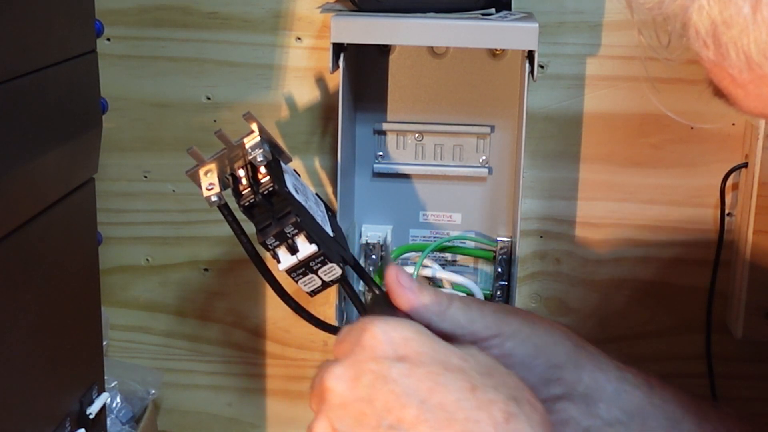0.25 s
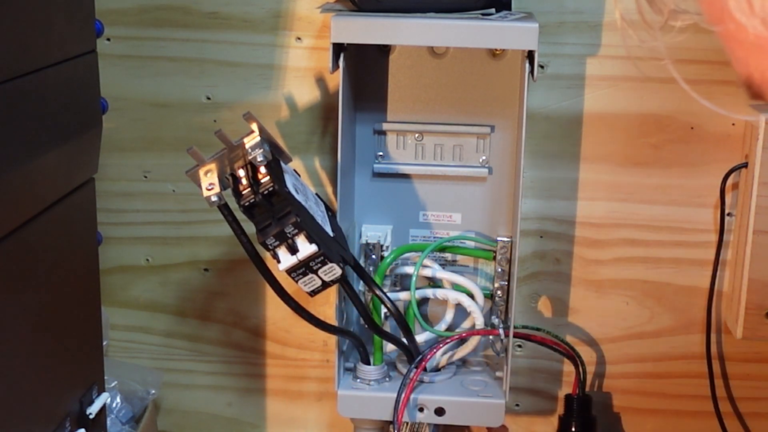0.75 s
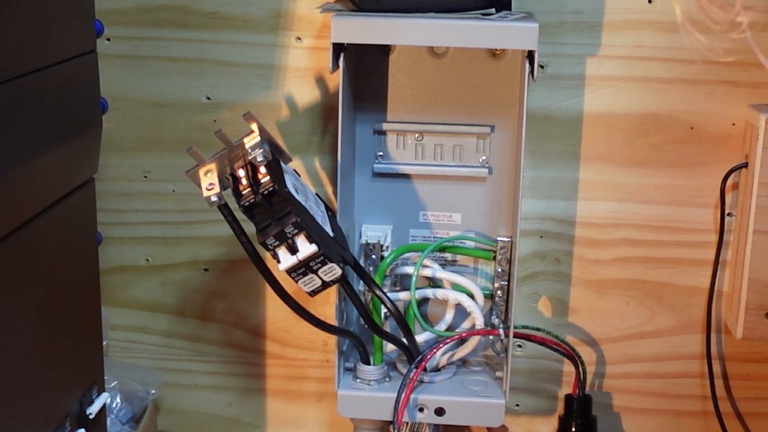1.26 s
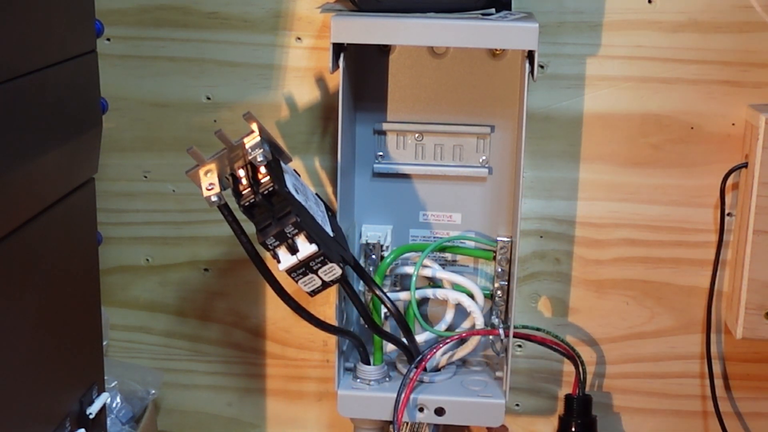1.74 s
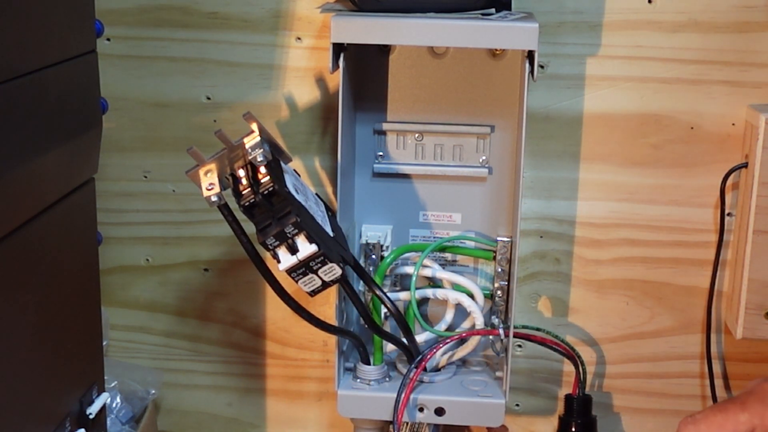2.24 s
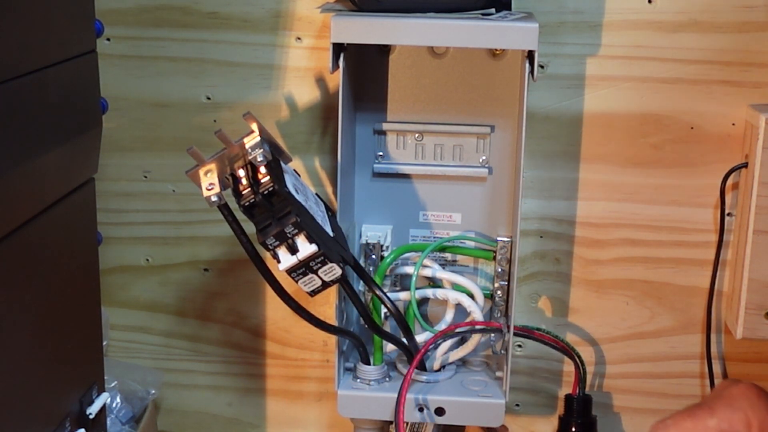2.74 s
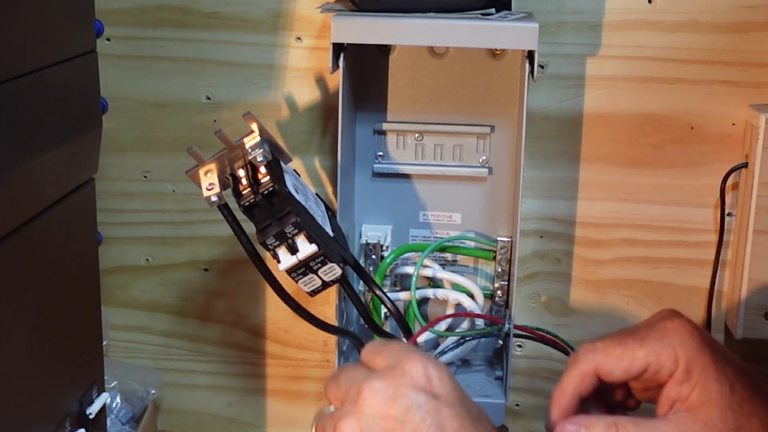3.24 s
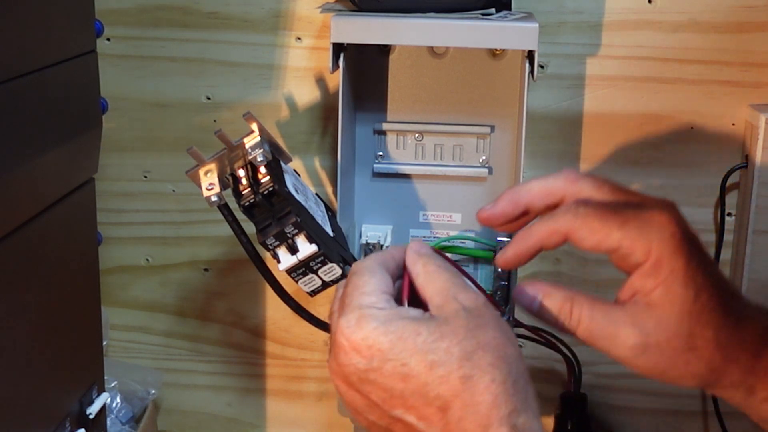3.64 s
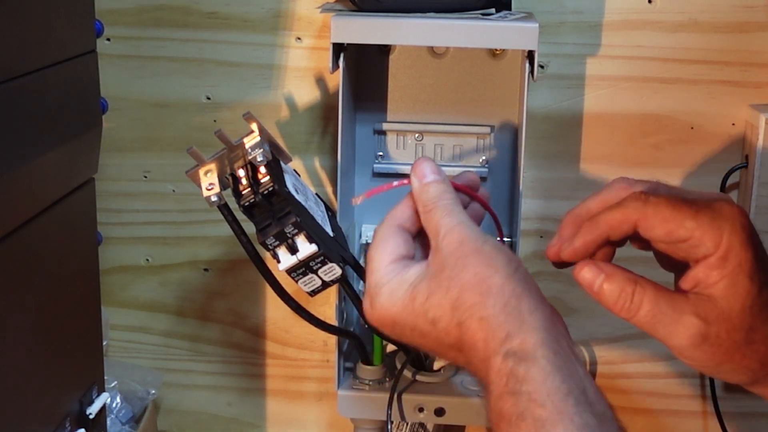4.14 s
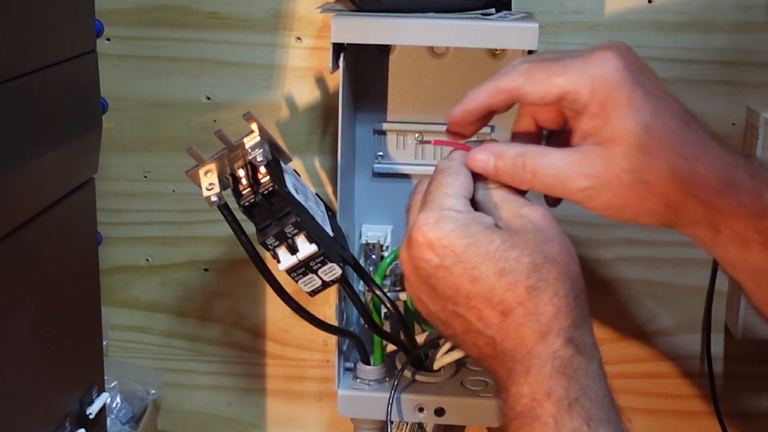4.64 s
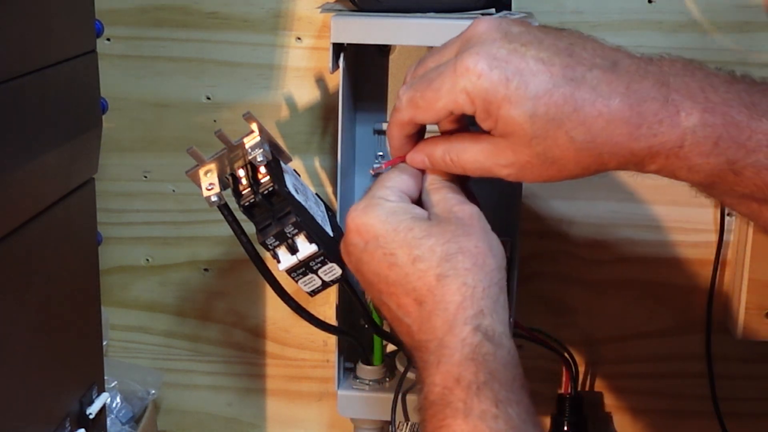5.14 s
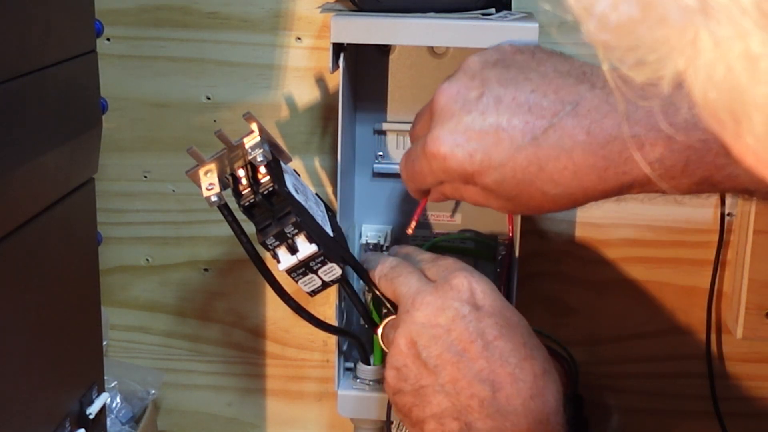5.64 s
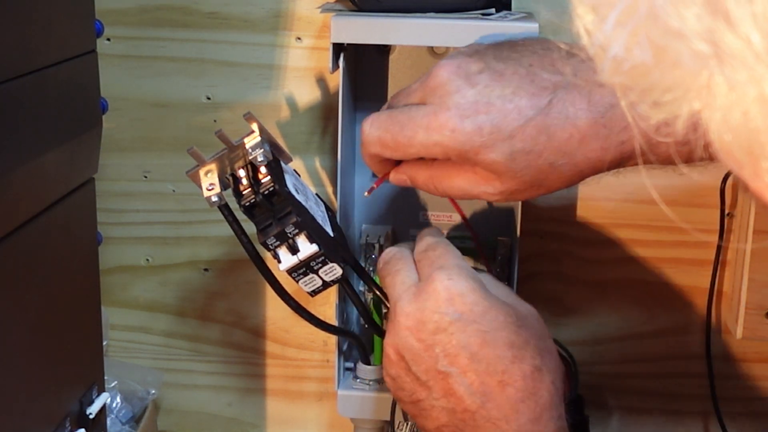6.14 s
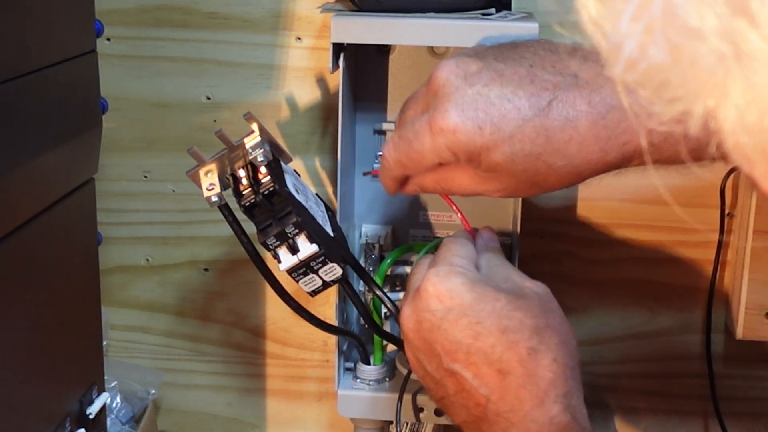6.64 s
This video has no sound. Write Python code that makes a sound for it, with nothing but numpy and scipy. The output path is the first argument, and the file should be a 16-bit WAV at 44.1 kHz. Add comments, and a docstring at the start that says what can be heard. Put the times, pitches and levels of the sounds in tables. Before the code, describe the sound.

A screwdriver clatters down among tools and rocks to rest, then wires tap, scrape and tick against a sheet-steel box in a small wooden shed.

```python
"""Hands route stiff wires inside a sheet-steel electrical box in a small wooden shed, heard from close by.
A sleeve rustles first: clumped grains of noise. At 1.4 s a screwdriver drops among tools with a clatter and
its handle rocks to rest: struck modes ring under dying noise. From 2.7 s wires tap and scrape on the box,
dense grains exciting its modes; a small part tinks and copper sings on an edge. Thumps boom in the planks
from the drop onwards, and the shed answers, over a steady room tone that differs partly between the sides."""
import sys
import numpy as np
from scipy import signal
from scipy.fft import rfft, irfft, next_fast_len
from scipy.io import wavfile
from scipy.ndimage import map_coordinates

SR = 44100
rng = np.random.default_rng(int(sys.argv[2]) if len(sys.argv) > 2 else 0)


def to_wav(sig):
    """Store sig (one row per channel, or 1-D mono) as 16-bit WAV at the path in sys.argv[1].

    Samples outside -1..1 are clipped; the rate is SR.
    """
    pcm = np.clip(np.atleast_2d(sig), -1, 1) * 32767
    pcm = np.round(pcm).astype(np.int16)
    wavfile.write(sys.argv[1], SR, pcm.T)  # frames by channels


def gain_from_db(level_db):
    """Turn a decibel level (scalar or array-like) into a linear amplitude factor."""
    decades = np.asarray(level_db, float) / 20
    return 10 ** decades


N = 303849

# modes of the sheet-steel box: (nominal frequency [Hz], level [dB], free T60 [s])
BOX_MODES = [(593, -6.5, 0.2), (760, -16.5, 0.24), (958, -14, 0.19), (1311, 0, 0.6), (1618, -4.5, 0.087),
             (1724, 8, 0.12), (2190, -1, 0.14), (2384, 0, 0.07), (2560, -9.5, 0.16), (2830, -38, 0.024),
             (3305, -14, 0.45), (3520, -12, 0.17), (3932, -2, 0.2), (4400, 8.5, 0.041), (4596, -3.5, 0.26),
             (4944, -6, 0.3), (5380, -36.5, 0.026), (5810, -35, 0.047), (5730, -29.5, .1), (7600, -6, 0.19),
             (9200, -12, 0.23)]
# noise spectrum of contact on the box: (frequency [Hz], level [dB per Hz])
CRACK_SPECTRUM = [(59, -57), (100, -32), (420, -29), (560, -19), (614, -26), (1180, -11.5), (1730, -3),
                  (1880, -8.5), (2220, -17.5), (4460, -10.5), (7410, -27), (15500, -34)]
# noise spectrum of contact among the tools and on the bench: (frequency [Hz], level [dB per Hz])
CRASH_SPECTRUM = [(88, -33.5), (150, -9), (471, -9.5), (844, -8), (1480, -15.5), (2450, -8.5),
                  (2760, -15.5), (3760, -21), (9000, -25), (15500, -49)]


def wire_taps():
    """Modal excitation: each tap of a wire or finger sets the box's damped modes ringing."""
    # (time [s], middle-band level [dB], thud re middle [dB], treble re middle [dB])
    taps = [(2.734, -24.5, -9, 0), (2.804, -25.5, -10, -3.5), (2.854, -27, -11, -47),
            (2.894, -31, -7.5, -19.5), (2.922, -35.5, -4, 1.5), (2.941, -19.5, -20, -39),
            (2.973, -24.5, -29, -28.5), (3.018, -30, -7.5, -28), (3.052, -25, -33, 3.5),
            (3.091, -15, -16, -31.5), (3.103, -17, -16, -14.5), (3.115, -14, -13, -34),
            (3.138, -12.5, -14.5, -21), (3.155, -20.5, -27, -6), (3.262, -34.5, -3, 4),
            (3.28, -21, -13, -0.5), (3.3, -32.5, -0.5, 3), (3.358, -19.5, -20, -2.5),
            (3.369, -12, -24, 1.5), (3.378, -9, -18.5, -20.5), (3.395, -17.5, -17, -2),
            (3.421, -23.5, -4.5, -14), (3.58, -32, -8, -2.5), (3.661, -35, -5, -4.5),
            (3.765, -42.5, -9, -5.5), (3.793, -35.5, -8, -3), (3.818, -29, -13, -19.5),
            (3.842, -25.5, -17, -26), (3.862, -31.5, -13, -14), (3.895, -24, -13.5, -11),
            (3.902, -20.5, -20, -21), (3.954, -29, -12, -4), (3.97, -26, -13, -3), (4.016, -39, -18, -16),
            (4.357, -44.5, -17.5, -15.5), (4.596, -43, -31, -1), (4.5995, -10, -29, -2),
            (4.755, -23.5, -11, -8), (5.296, -38, -31, -10), (5.333, -31.5, -9.5, -14),
            (5.617, -22, -31, 4), (5.78, -22, -15.5, -4), (5.821, -20, -12.5, -18),
            (5.835, -33.5, 5.5, -21), (5.997, -32, -36, -17), (6.062, -34.5, -6, -16), (6.2, -36, -19, -21),
            (6.23, -21, -20, -22), (6.238, -17.5, -22, -5), (6.269, -34, -3.5, -21), (6.491, -25, -34, -2),
            (6.503, -25, -11.5, -4), (6.523, -31, 1.5, -14), (6.577, -42.5, -1, -1),
            (6.661, -39.5, -8, 0.5), (6.727, -30, -20, -11), (6.741, -22.5, -29, 3.5),
            (6.763, -13.5, -21, -4), (6.783, -15.5, -13, -30), (6.799, -28.5, -26, -16),
            (6.818, -23, -37, -9)]
    return strikes(taps, BOX_MODES, CRACK_SPECTRUM, (800, 3100, 5700), top_db=-10, top_follows=0.34,
                   t60=0.051, crack_db=-7.5, gain_db=-0.5, grip=29.7, chatter_s=0.003)


def scrape():
    """Friction: dense micro-impacts under each stroke excite the box's modes over a broad rasp."""
    # wires dragging on the box: (time [s], hold [s], level [dB], brightness re middle band [dB])
    strokes = [(2.72, 0.057, -57.5, -2), (2.89, 0.25, -48, -5), (3.24, 0.09, -54.5, -1.5),
               (3.47, 0.27, -65, 0), (3.8, 0.25, -59, -4), (4.38, 0.095, -61.5, -30),
               (4.68, 0.28, -57.5, -1), (5.06, 0.094, -65, 6.5), (5.34, 0.014, -51.5, 3.5),
               (5.45, 0.13, -67, 5.5), (5.681, 0.059, -44, -0.5), (5.84, 0.23, -55.5, -4),
               (6.189, 0.13, -52.5, -6), (6.45, 0.35, -59.5, -4), (6.771, 0.073, -50.5, 6.5)]
    peaks = [(hz, 7 / t60, db) for hz, db, t60 in BOX_MODES]  # rubbing contact widens each mode
    rub = grains(7400, spread_db=-1.0, clump_db=3)
    rasp = coloured(rub, CRACK_SPECTRUM) + gain_from_db(-1.0) * unit(filtered(rub, resonances(peaks)))
    low, mid, high, top = bands(rasp, (900, 3200, 6000))
    body = (2.37 * low + mid) / np.std(mid)
    bright = unit(high + top)
    out = np.zeros(N)
    for start_s, held_s, db, bright_db in strokes:
        out += gain_from_db(stroke(start_s, held_s, db)) * (body + gain_from_db(bright_db) * bright)
    return out


def copper_drag():
    """Resonant filtering of friction: bare copper dragged over a steel edge sings above its rasp."""
    # one stroke of copper on the edge: (time [s], hold [s], level [dB])
    drag = (5.87, 0.16, -47)
    # resonances of the singing: (centre [Hz], width [Hz], level [dB])
    strand = [(1760, 38, -23), (2157, 37, 0), (2550, 35, -15), (4880, 84, 1), (6000, 50.7, -5),
              (7020, 55, -6), (7900, 130, -10.5), (8740, 150, -4), (11100, 37, -42), (13300, 240, -11)]
    # spectrum of the rasp: (frequency [Hz], level [dB per Hz])
    rasp = [(240, -38), (400, -10.5), (1560, -2), (3740, -10), (4840, -3), (15500, -20.5)]
    rub = grains(8000, spread_db=2, clump_db=2)
    singing = unit(filtered(rub, resonances(strand)))
    return gain_from_db(stroke(*drag)) * (singing + gain_from_db(-0.5) * coloured(rub, rasp))


def part_tinks():
    """Modal excitation of a small body: a small steel part is touched and rings at a few high modes."""
    # (time [s], middle-band level [dB], thud re middle [dB], treble re middle [dB])
    tinks = [(5.1158, -48.5, -33, 2), (5.1726, -56, -38, -3)]
    # modes of the part: (nominal frequency [Hz], level [dB], free T60 [s])
    part = [(2608, -4, 0.14), (4845, -14, 0.25), (7820, 2, 0.066)]
    return strikes(tinks, part, CRACK_SPECTRUM, (1500, 3500, 6000), top_db=-19.5, top_follows=0,
                   t60=0.08, crack_db=-20, gain_db=3.5, grip=5.9, chatter_s=0.0023)


def screwdriver_drop():
    """Repeated impact: the falling screwdriver makes a run of contacts, each ringing the tools' modes."""
    # (time [s], middle-band level [dB], thud re middle [dB], treble re middle [dB])
    clatter = [(1.3589, -23, 7, 0), (1.3775, -11.5, -30.5, 1), (1.3914, -14, 2.5, -8.5),
               (1.4108, -7.5, -12, -7), (1.4245, -14.5, 2.5, -26.5), (1.4434, -12, 6, -29),
               (1.458, -9.5, -33, -3), (1.4746, -7.5, -4.5, -19.5), (1.4919, -7.5, -1, -11),
               (1.5231, -13.5, 3, -1.5), (1.5328, -16.5, 14, -21), (1.5454, -18.5, 3, -5),
               (1.5555, -24.5, -5, -19.5), (1.5725, -39, 11, 8), (1.5844, -39, -7.5, 8),
               (1.5974, -42.5, 11, 8.5), (1.6166, -35, 11, -1)]
    # modes of the tools: (nominal frequency [Hz], level [dB], free T60 [s])
    tools = [(400, -11, .08), (607, -8, .08), (710, -8, .08), (825, -6, .08), (900, -8, .08),
             (1700, -11, .1), (2391, 4, .12), (2510, -8, .2), (2960, -15, .1), (3170, -15, .1),
             (3310, -14, .1), (3740, -14, .08), (5460, -22, .06), (6310, -24, .05), (6750, -26, .05),
             (8180, -28, .05), (10430, -27, .08), (12800, -30, .06)]
    return strikes(clatter, tools, CRASH_SPECTRUM, (1200, 4000, 7500), top_db=-7.5, top_follows=0.87,
                   t60=0.062, crack_db=-6, gain_db=-1.0, grip=5, chatter_s=0.0001)


def handle_rocking():
    """Dissipative rocking: after a double first landing, shrinking intervals and mostly fainter contacts."""
    # (time [s], middle-band level [dB], treble re middle [dB])
    rocking = [(1.916, -29, -2.5), (1.932, -27, -20), (2.118, -33.5, -0.5), (2.266, -36, -2),
               (2.375, -40.5, -5.5), (2.458, -41, -5.5), (2.533, -47.5, -8), (2.582, -43, -4),
               (2.624, -49.5, -4), (2.666, -50.5, 3.5)]
    # modes of the handle: (nominal frequency [Hz], level [dB], free T60 [s])
    handle = [(729, 4, 0.089), (926.6, 3.5, 0.15), (1370, -11, 0.1), (1680, -28, 0.51),
              (2494, -52.5, 0.069), (2490, -5.5, 0.04), (3850, -34, 0.14), (4172, -36, 0.18),
              (4060, -23, 0.18), (5360, -17, 0.04)]
    thud_db = -13  # re middle band
    landings = [(start_s, db, thud_db, treble_db) for start_s, db, treble_db in rocking]
    return strikes(landings, handle, CRASH_SPECTRUM, (500, 1500, 3500), top_db=-3.5, top_follows=1.0,
                   t60=0.11, crack_db=-12, gain_db=2.0, grip=12, chatter_s=0.0013)


def bumps():
    """Plate resonance: thumps set the planks booming, each with its own weighting of the low modes."""
    # thumps of the drop, the rocking handle, hands and cables on bench and wall:
    # (time [s], level [dB], mode weight for each octave below 170 Hz [dB])
    thumps = [(1.416, -22.5, -8), (1.481, -22, -6), (1.529, -19, -10), (1.618, -27.5, -7), (1.93, -44, 7.5),
              (2.12, -53, -5), (2.268, -57, 6), (2.951, -56, 7), (3.083, -48.5, 10), (3.277, -53, 9),
              (3.378, -45.5, -10), (3.487, -47.5, 12), (3.669, -52.5, 17), (3.793, -54, 15),
              (3.897, -55, 12), (3.963, -43, 8), (4.019, -51.5, 12.5), (4.616, -49, -4), (6.184, -44, 1.5),
              (6.241, -49, 21), (6.419, -53, 0), (6.446, -53, -1), (6.524, -45.5, 13), (6.682, -41.5, -1.5),
              (6.75, -42, 3.5), (6.79, -43, 0.5)]
    # modes of the planks: (nominal frequency [Hz], level before weighting [dB], free T60 [s])
    planks = [(87, -9.5, 0.13), (129, -8.5, 0.5), (167.2, 4.5, 0.081), (191, 1.5, 0.22), (236, -6, 0.15),
              (312.6, -15.5, 0.049)]
    decay_s = 0.075  # the shudder falls 40 dB in this time
    out, t = np.zeros(N + SR), np.arange(SR // 3) / SR
    for start_s, db, depth_db in thumps:
        modes = [(hz, level + depth_db * np.log2(170 / hz), life) for hz, level, life in planks]
        peaks = [(hz, 60, level) for hz, level, _ in modes]
        shudder = unit(filtered(rng.standard_normal(len(t)), resonances(peaks)))
        shudder = gain_from_db(-3.5 - 40 * t / decay_s) * shudder
        boom = ringing(modes, t, decay_s, grip=17, scatter_db=2) + shudder
        boom = boom * (1 - np.exp(-t / 0.01))  # soft onset
        out[round(start_s * SR):][:len(t)] += gain_from_db(db + 5.5) * boom / np.abs(boom).max()
    return out[:N]


def shed(x):
    """Reverberation: plank walls answer quickly; a faint smeared wash lingers. Sides differ more in the treble."""
    # decay of the quick answer: (frequency [Hz], T60 [s])
    decay_times = [(150, .14), (1000, .15), (4000, .12), (12000, .07)]
    smear_hz = 250  # how far the late wash blurs a ringing pitch
    hz, t, z = signal.stft(rng.standard_normal((2, 2, SR // 2)), SR, nperseg=256)
    t60 = along(decay_times, hz)[:, None]
    quick = gain_from_db(-60 * t / t60)
    late = gain_from_db(-27.5 - 60 * t / (5 * t60))
    decay = np.array([quick, late])[:, None]
    common, apart = signal.istft(z * decay, SR, nperseg=256)[1].swapaxes(0, 1)
    apart = filtered(apart, lambda f: 0.5 * f / (f + 900))  # grows with frequency
    tails = np.array([common + apart, common - apart]) / np.linalg.norm(common[0])
    smear = unit(filtered(rng.standard_normal(N), lambda f: f < smear_hz))
    feed = np.pad([x, x * smear], ((0, 0), (150, 0)))  # delay in samples
    return signal.fftconvolve(feed[None], tails, axes=2).sum(1)[:, :N]


def sleeve_rustle():
    """Friction of cloth: clumped micro-impacts, mostly low in pitch, as a sleeve brushes past."""
    # (time [s], hold [s], level [dB])
    brushes = [(0, 0.032, -58), (.14, 0.028, -62)]
    # spectrum of the cloth: (frequency [Hz], level [dB per Hz])
    cloth = [(59, -33), (100, -5), (637, -13), (886, -9.5), (8000, -36), (10400, -65.5), (17600, -120)]
    envelope = sum(gain_from_db(stroke(*row)) for row in brushes)
    return envelope * coloured(grains(5000, spread_db=3.5, clump_db=1), cloth)


def room_tone():
    """Partial coherence: steady room tone and microphone hiss, mixed from mid and side noise."""
    # (frequency [Hz], level [dB per Hz])
    tone = [(40, -14), (80, -3), (200, -1), (320, 0), (500, -2), (1000, -5), (2000, -8), (4000, -11),
            (8000, -16.5), (15500, -20.5)]
    # left-right correlation: (frequency [Hz], coefficient [1])
    alike = [(60, 0.16), (240, 0.37), (950, 0.19), (3770, 0.22), (15000, 1)]
    mid_rms_db = -62.5

    def response(hz):
        """Mid and side weights: cos^2 - sin^2 of the angle equals the correlation."""
        angle = np.arccos(np.clip(along(alike, hz), -1, 1)) / 2
        return gain_from_db(along(tone, hz)) * [np.cos(angle), np.sin(angle)]

    mid, side = filtered(rng.standard_normal((2, N)), response)
    return gain_from_db(mid_rms_db) * np.array([mid + side, mid - side]) / np.std(mid)


def strikes(events, modes, spectrum, edges_hz, top_db, top_follows, t60, crack_db, gain_db, grip, chatter_s):
    """Impact: each contact chatters briefly and rings the modes under a dying crack, coloured in four bands."""
    out, t = np.zeros(N + SR), np.arange(SR // 3) / SR
    for start_s, db, thud_db, treble_db in events:
        crack = coloured(rng.standard_normal(len(t)), spectrum) * gain_from_db(-60 * t / t60)
        hit = ringing(modes, t, t60, grip, scatter_db=2.0) + gain_from_db(crack_db) * crack
        hit = hit * (1 - np.exp(-t / 0.0017))  # softened onset
        when, size = rng.random((2, 3))
        delays = (when * chatter_s * SR).astype(int)
        rebounds = np.bincount(np.r_[0, delays], np.r_[0.7, size])
        low, mid, high, top = bands(np.convolve(hit, rebounds)[:len(t)], edges_hz)
        top = top * gain_from_db(-25 * t / t60)  # the top dies first
        relative_db = (thud_db, 0, treble_db, top_db + top_follows * treble_db)
        for part, rel in zip((low, mid, high, top), relative_db):
            out[round(start_s * SR):][:len(t)] += gain_from_db(db + gain_db + rel) * part / np.abs(part).max()
    return out[:N]


def ringing(modes, t, t60, grip, scatter_db):
    """Modal superposition: damped sines at scattered strengths and pitches, damped further by grip; peak 1."""
    hz, mode_db, mode_t60 = np.transpose(modes)[:, :, None]
    luck = rng.standard_normal((len(modes), 2))
    damping = 60 / mode_t60 + grip / max(t60, 0.01)  # dB per second
    envelope = gain_from_db(mode_db + scatter_db * luck[:, :1] - damping * t)
    pitch = hz * (1 + 0.0055 * luck[:, 1:])
    ring = (envelope * np.sin(2 * np.pi * pitch * t)).sum(0)
    return ring / np.abs(ring).max()


def stroke(start_s, held_s, db):
    """Exponential growth and decay: level in dB of one stroke, a quick rise, a hold, a fall."""
    rise_db_per_s, fall_db_per_s = 323, 229
    t = np.arange(N) / SR - start_s
    return db + rise_db_per_s * np.minimum(t, 0) - fall_db_per_s * np.maximum(t - held_s, 0)


def grains(per_second, spread_db, clump_db):
    """Poisson-like process: random micro-impacts of uneven size, coming in clumps; rms 1."""
    knots = rng.standard_normal(int(60 * N / SR) + 4)  # 60 a second
    clumps = gain_from_db(clump_db * map_coordinates(knots, [np.arange(N) * 60 / SR]))
    hits = (rng.random(N) < per_second / SR) * rng.standard_normal(N)
    return unit(hits * clumps * gain_from_db(spread_db * rng.standard_normal(N)))


def resonances(peaks):
    """Superposed second-order resonators, alternating in sign: a response from (Hz, width Hz, dB) peaks."""
    def response(f):
        total = 0
        for k, (centre, width, db) in enumerate(peaks):
            damping = 1j * f * width
            total = total + (-1) ** k * gain_from_db(db) * damping / (centre * centre - f * f + damping)
        return total
    return response


def bands(x, edges_hz):
    """Causal Butterworth filters: a split into bass, middle, treble and top."""
    a, b, c = edges_hz
    cuts = [(a, "low"), ([a, b], "band"), ([b, c], "band"), (c, "high")]
    return [signal.sosfilt(signal.butter(3, hz, kind, fs=SR, output="sos"), x) for hz, kind in cuts]


def coloured(x, spectrum):
    """Spectral shaping: x weighted by a (Hz, dB) spectrum, rms 1."""
    return unit(filtered(x, lambda hz: gain_from_db(along(spectrum, hz))))


def filtered(x, response):
    """Convolution theorem: the spectrum of x times a response of frequency."""
    n = x.shape[-1]
    m = next_fast_len(n + 8192)  # room for the filter's tail
    return irfft(rfft(x, m) * response(np.fft.rfftfreq(m, 1 / SR)), m)[..., :n]


def along(points, hz):
    """Logarithmic frequency scale: (Hz, value) points interpolated on a log axis."""
    f, v = np.transpose(points)
    return np.interp(np.log(hz + 1), np.log(f + 1), v)


def unit(x):
    """Root-mean-square normalisation: x scaled to rms 1."""
    return x / np.sqrt(np.mean(x ** 2) + 1e-20)


def scene():
    """Superposition: contacts in the shed, middle leaning right and top treble left, over the background."""
    # level difference of sounds at the box: (frequency [Hz], left minus right [dB])
    lean = [(60, 0), (180, 0), (550, -2.5), (1650, -2), (4970, -2.5), (15000, 3)]
    dull_hz = 12000  # hands and box shade the highest treble
    wires = wire_taps() + scrape() + copper_drag() + part_tinks()
    contacts = wires + screwdriver_drop() + handle_rocking() + bumps()
    near = filtered(contacts, lambda hz: 1 / (1 + 1j * hz / dull_hz) ** 2)
    wet = near + gain_from_db(-8) * shed(near)
    placed = filtered(wet, lambda hz: gain_from_db(np.array([[0.5], [-0.5]]) * along(lean, hz)))
    return placed + room_tone() + sleeve_rustle()


def band_limit(x):
    """A steep low-pass at the top of the band."""
    return signal.sosfilt(signal.butter(12, 15760, fs=SR, output="sos"), x)


def record(dry):
    """Band limitation: the microphone cuts the deep bass, and the highest treble is removed."""
    bass_cut_hz, top_hz = 85, 15700
    cut = signal.sosfilt(signal.butter(4, bass_cut_hz, "high", fs=SR, output="sos"), dry)
    mix = filtered(cut, lambda hz: hz < top_hz)
    return band_limit(mix)


dry = scene()
out = record(dry)
to_wav(out)
```